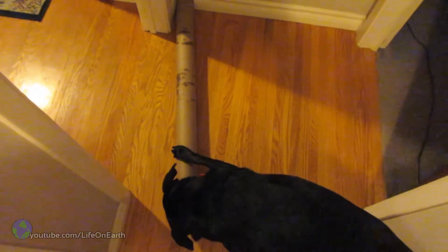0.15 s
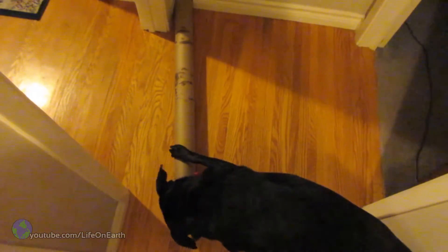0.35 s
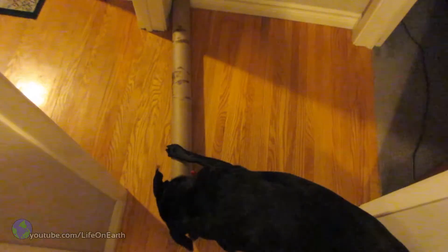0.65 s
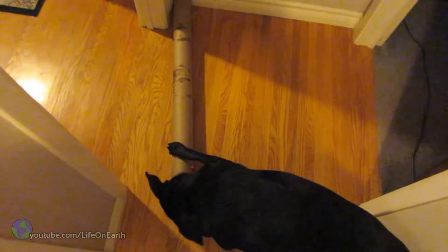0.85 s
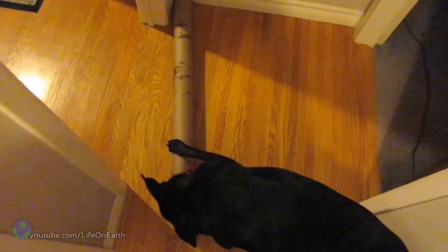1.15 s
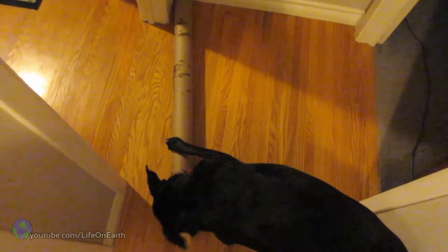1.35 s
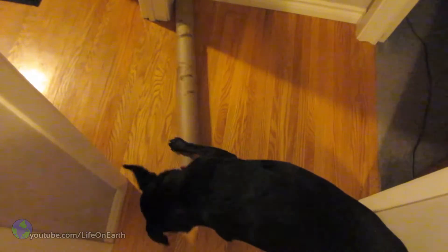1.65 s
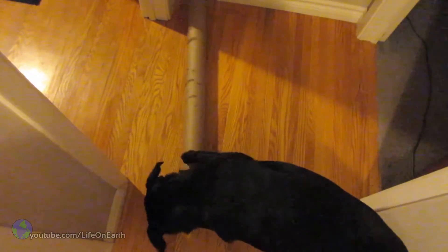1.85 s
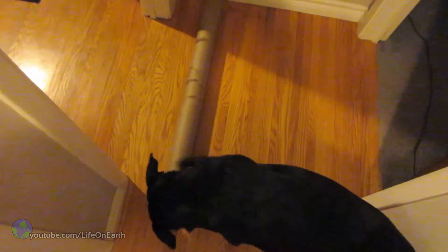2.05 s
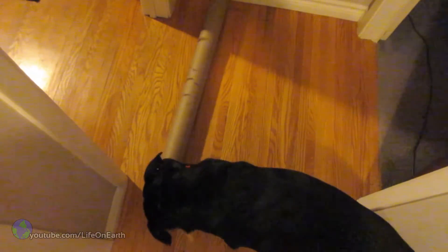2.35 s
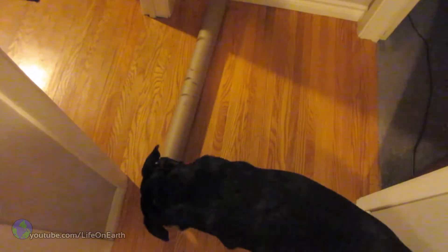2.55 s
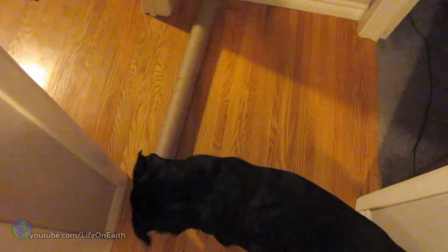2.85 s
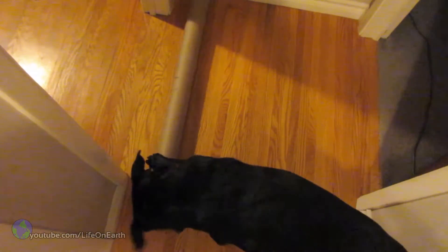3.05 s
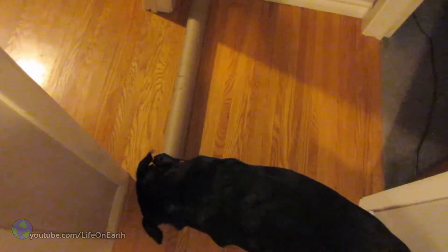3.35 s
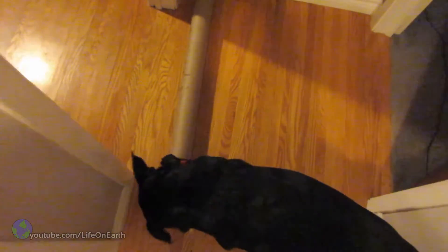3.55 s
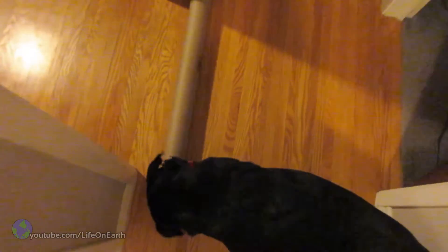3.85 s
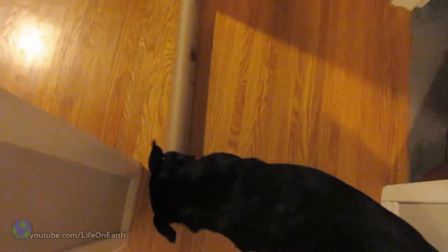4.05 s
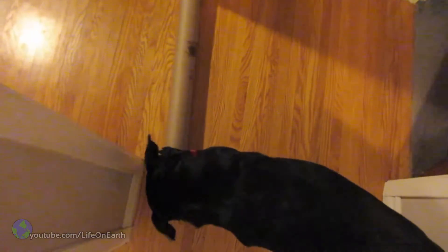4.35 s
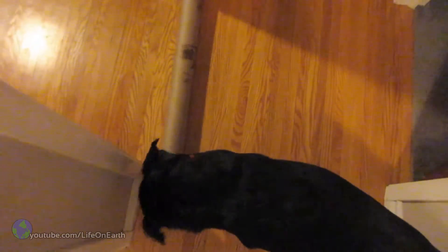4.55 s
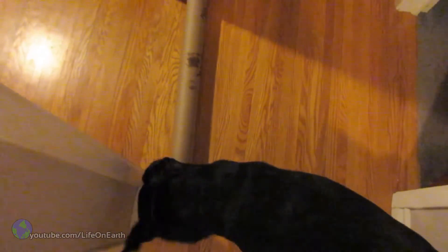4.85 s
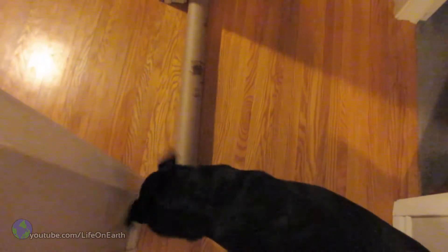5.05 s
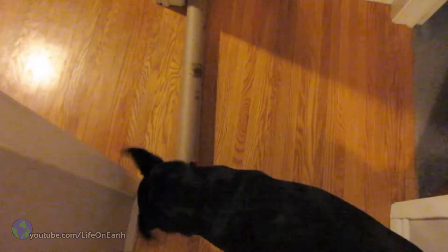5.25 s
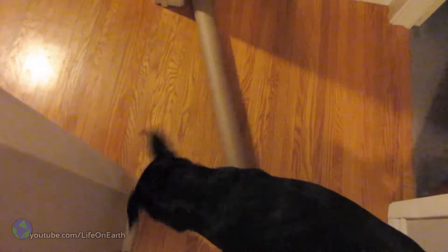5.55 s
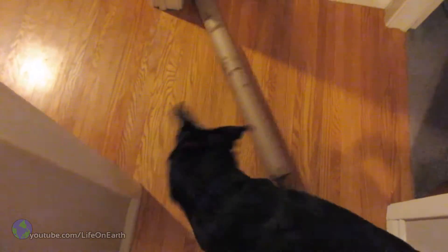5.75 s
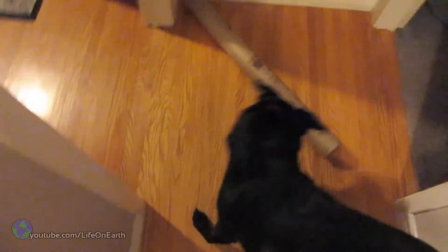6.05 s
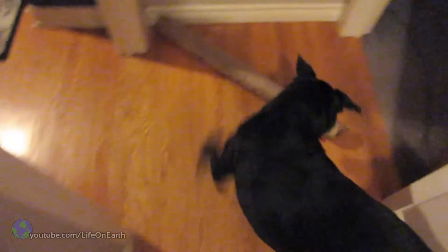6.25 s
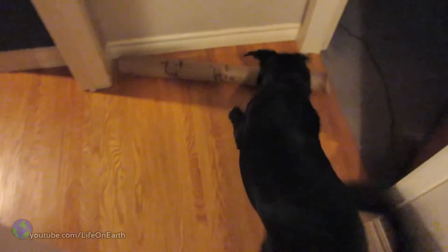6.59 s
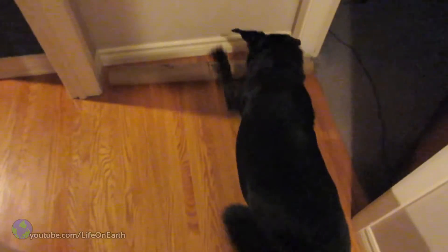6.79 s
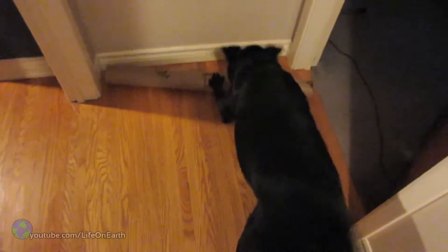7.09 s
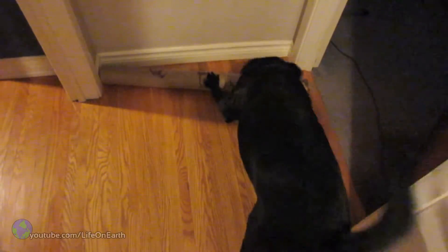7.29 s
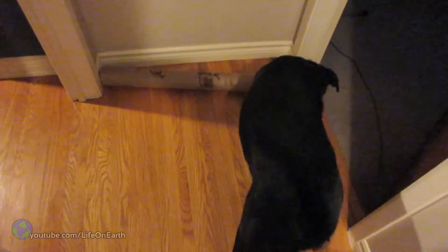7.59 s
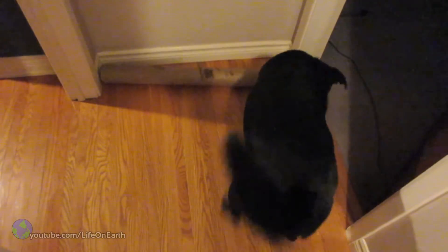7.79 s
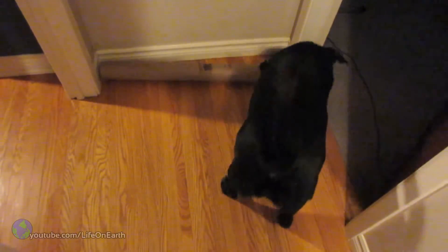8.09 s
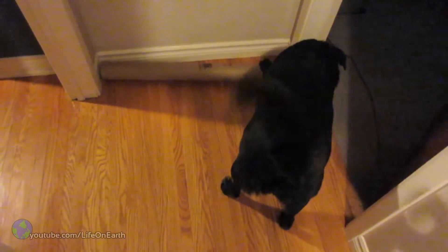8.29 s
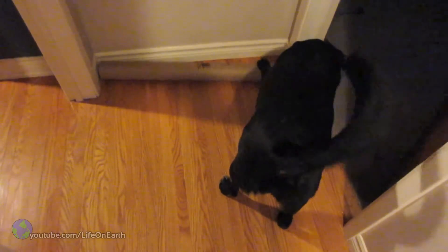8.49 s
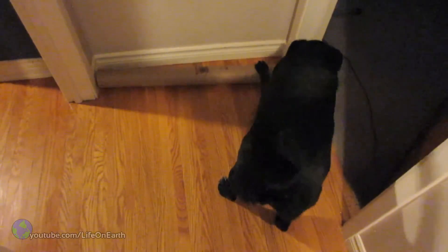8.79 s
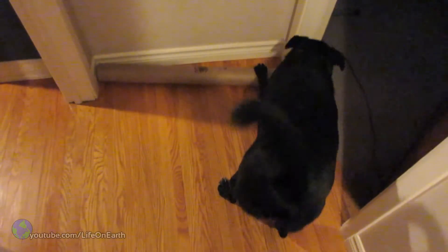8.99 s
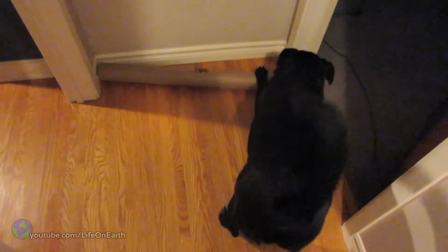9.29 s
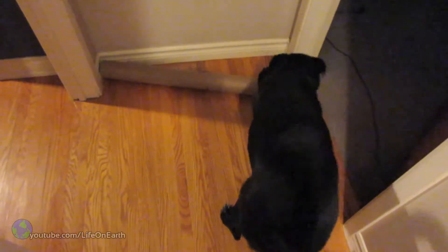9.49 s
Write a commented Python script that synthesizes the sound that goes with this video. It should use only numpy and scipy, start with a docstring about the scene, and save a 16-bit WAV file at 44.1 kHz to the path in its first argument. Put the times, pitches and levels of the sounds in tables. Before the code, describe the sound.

In a small indoor hallway, heard close from above, a dog wrestles a long cardboard tube. Light taps and dry rubbing come first, then a cluster of hollow knocks with boomy thuds around two seconds. Scrapes build to a hard knock, tags jingle faintly, and sharp clacks and paw thumps follow, thinning to scattered knocks and a last pair of solid bumps over quiet house hum.

```python
"""Small hallway with a hardwood floor: a dog shoves a long cardboard tube, heard from close above.
Knocks on door frames and boards are fibre-crunch noise through the modes of the cardboard wall;
heavy blows ring decaying sines of the boards and of the air in the tube.
Scraping is filtered grainy noise that follows the rubbing; collar tags are chatter through metal modes.
Fainter: whining tones, rolling weight, chance ticks, room reflections and the quiet of the house."""
import sys
import numpy as np
from scipy import signal
from scipy.fft import rfft, irfft
from scipy.io import wavfile
from scipy.ndimage import uniform_filter1d

SR = 44100
rng = np.random.default_rng(int(sys.argv[2]) if len(sys.argv) > 2 else 0)


def log_audio(samples):
    """Write samples as a 16-bit WAV file to the path given in sys.argv[1]."""
    # one column per channel
    frames = np.atleast_2d(samples).T
    # limit to full scale, then quantise
    limited = np.clip(frames, -1, 1)
    pcm = np.round(limited * 32767).astype(np.int16)
    wavfile.write(sys.argv[1], SR, pcm)


N = 424683
TIME = np.arange(N) / SR

# tube strikes wood: t/s, hollow level/dB, crack level/dB, crack band centre f/Hz,
# edge level before trim/dB, contact t60/s, air boom level/dB, air overtone level/dB
KNOCKS = [(0.012, -28, -29.5, 1650, -74, 0.12, -42, -45), (0.1153, -40, -43, 2080, -70, .06, -52, -50.5),
          (0.3823, -31, -26.5, 2620, -37.5, 0.092, -41.5, -46),
          (0.5794, -37, -17.5, 2400, -47, 0.023, -40, -45),
          (0.5849, -37.5, -39, 2730, -16.5, 0.013, -67, -66),
          (0.738, -78, -44.5, 3600, -43, 0.12, -73, -87.5), (1.0077, -54, -59, 2270, -59, 0.36, -58, -64),
          (1.3866, -34, -37.5, 2230, -33.5, .095, -68, -58),
          (1.875, -43, -40.5, 2030, -63, 0.1, -32.5, -38.5), (1.987, -26, -16, 2540, -64, 0.051, -55, -58),
          (2.046, -37.5, -35.5, 2510, -59, 0.086, -34, -36), (2.0808, -54, -25, 1490, -65, 0.073, -21, -37),
          (2.1484, -29, -18.5, 3600, -36, 0.048, -47, -48), (2.163, -24, -17, 2000, -47, 0.057, -31, -27.5),
          (2.2336, -34, -27, 1920, -42, .14, -23.5, -24), (2.2808, -49, -31, 1520, -63, 0.052, -55, -32),
          (2.771, -19, -17.5, 2000, -33, 0.086, -22.5, -30),
          (3.7543, -40, -24.5, 3300, -41, 0.055, -52, -52),
          (3.7782, -32.5, -26, 2410, -45, 0.1, -35.5, -50),
          (3.8505, -31.5, -32.5, 2290, -38, 0.22, -39, -41), (3.884, -43, -39, 2440, -63, 0.1, -55, -50.5),
          (4.069, -40.5, -63, 2100, -49, 0.049, -37.5, -44), (4.338, -33, -35, 2200, -37, 0.068, -47, -46),
          (4.382, -35.5, -33, 2360, -29, 0.2, -46, -52),
          (4.5416, -15, -18.5, 1870, -24, 0.028, -18.5, -24.5),
          (5.4948, -18, -19.5, 1550, -27.5, 0.086, -36, -40.5),
          (5.5432, -41, -26.5, 3000, -31.5, 0.16, -30, -36.5),
          (6.0577, -36, -23.5, 2930, -17.5, 0.054, -41, -50), (6.063, -45, -30, 2920, -24, 0.2, -48, -58),
          (6.2102, -46, -38, 2850, -40, 0.13, -47, -46),
          (6.4172, -24.5, -17.5, 3180, -14.5, .086, -23, -37),
          (6.4597, -23.5, -21, 2500, -20.5, 0.13, -23.5, -31.5),
          (6.512, -39, -28, 3180, -22, 0.12, -49, -38), (6.697, -68, -42, 3650, -37, 0.099, -40, -59),
          (6.7877, -14.5, -19.5, 2610, -36, 0.021, -30, -26),
          (6.8894, -33, -47, 1510, -63, 0.049, -56, -61), (6.9091, -34, -36.5, 2650, -37.5, .11, -26, -38),
          (7.1424, -37.5, -34.5, 1750, -59, 0.061, -60, -58),
          (7.2162, -42.5, -56, 2200, -56, 0.23, -55, -46), (7.2751, -36, -45, 1680, -90, 0.16, -33, -38),
          (7.5755, -28.5, -37.5, 1650, -72, .087, -29.5, -37.5),
          (7.6392, -33, -19, 3350, -20, .053, -36, -48), (7.647, -34, -24.5, 2700, -51, 0.14, -22, -19),
          (7.8345, -75, -49.5, 3250, -44.5, 0.14, -50, -62),
          (7.868, -59, -44.5, 3170, -45, 0.069, -52, -53), (7.9928, -67, -32.5, 3100, -18, 0.11, -33, -43),
          (8.137, -43.5, -43, 2560, -61, 0.3, -59, -56), (8.3868, -43, -57, 2120, -57, .086, -46, -50.5),
          (8.8454, -44, -42, 2640, -45, 0.61, -48, -46),
          (8.9621, -17.5, -22.5, 1780, -39, 0.12, -27.5, -37),
          (9.003, -18, -25.5, 1640, -47, 0.095, -24, -29), (9.1977, -40, -45, 1950, -51, 0.18, -45, -51),
          (9.2845, -40, -41, 2320, -43, 0.28, -54, -51), (9.376, -31, -28, 2550, -33, 0.12, -27.5, -31.5),
          (9.5078, -43, -33, 3330, -32.5, 0.17, -55, -63), (9.587, -45, -34.5, 3000, -47, 0.11, -55, -50)]
# low modes of the floor: f/Hz, relative level/dB, t60/s
FLOOR_MODES = [(53, -33, 0.4), (66.5, -4, 1), (81, 11, 0.42)]
# lowest modes of the air in the tube: f/Hz, relative level/dB, t60/s
BOOM_MODES = [(128.6, -11.5, 0.46), (151.3, -1.5, 0.26), (157.5, -11.5, 0.56), (174.1, -12, 0.32)]


def knocks(rise_s=0.002, edge_trim_db=-4.0, crack_width=1.554, hollow_width=1.385,
           snap_t60_s=0.006, edge_snap_t60_s=0.011):
    """Each contact is a short crunch of fibres that rings the wall; a longer contact has a deeper hollow."""
    # sharp edge spectrum: f/Hz, relative level/dB
    edge_spectrum = [(3000, -1.5), (5000, 8.5), (7000, 8), (9500, 3), (12000, -6), (15000, -24.5)]
    brief_contact_t60_s, brief_hollow_hz, sag_octaves_per_doubling = 0.049, 810, 0.12
    out, t, attack = np.zeros(N), np.arange(SR // 4) / SR, SR // 40
    for s, hollow_db, crack_db, crack_hz, edge_db, t60_s, _, _ in KNOCKS:
        stretch = max(t60_s / brief_contact_t60_s, 1)
        hollow_hz = brief_hollow_hz / stretch ** sag_octaves_per_doubling
        pressure = (fade(t, t60_s) + fade(t, snap_t60_s)) * np.minimum(t / rise_s, 1)
        force = even(grains(len(t), per_s=1900, spread_db=3.5) * pressure)
        hollow = wall(band(force, hollow_hz / hollow_width, hollow_hz * hollow_width))
        crack = wall(band(force, crack_hz / crack_width, crack_hz * crack_width))
        edge = colour(force * (1 + fade(t, edge_snap_t60_s)), edge_spectrum)
        sound = from_db(hollow_db) * rms_one(hollow, attack)
        sound += from_db(crack_db) * rms_one(crack, attack)
        sound += from_db(edge_db + edge_trim_db) * rms_one(edge, attack)
        add(out, s - .0012, sound)
    return out


def wall(x):
    """The cardboard wall passes a force on and rings at its modes."""
    # f/Hz, width/Hz, level/dB
    wall_modes = [(566, 18, -8.5), (667, 9.9, -3), (760, 28, -10.5), (836, 33, -7.5), (993, 50, 0),
                  (1277, 57, -16), (1436, 270, 9), (1980, 82, -10), (2440, 35, -29), (2690, 85, -9),
                  (3320, 160, -13), (4100, 130, -17), (4800, 400, -9.5)]
    return x + sum(from_db(db) * resonance(x, hz, width_hz) for hz, width_hz, db in wall_modes)


def heavy_blows():
    """Knocks and paws reach the low modes: rows t/s, strongest overtone f/Hz, floor, boom, overtones/dB."""
    # soft, heavy paw blows: t/s, floor level/dB, tube boom level/dB
    paws = [(1.894, -34, -34.5), (2.043, -34, -42), (2.097, -30, -24), (4.222, -57, -38), (4.69, -41, -30),
            (4.745, -52, -36.5), (5.453, -39, -38), (5.551, -38, -32), (5.739, -41.5, -44.5),
            (5.86, -37, -42), (6.059, -39, -43), (6.129, -31, -33.5), (6.2, -31, -28.5),
            (6.321, -31.5, -40), (6.432, -42, -23), (6.469, -32, -34), (6.68, -48, -42), (6.831, -42, -26),
            (6.912, -39, -33), (7.18, -46, -33), (7.673, -44, -23), (7.998, -36, -50), (8.196, -58, -39.5),
            (9.311, -39, -25.5), (9.447, -45, -37)]
    paw_overtone_hz, paw_overtones_below_boom_db = 272, 6
    knock_overtone_hz, overtone_octaves_per_db = 312.4, 0.04
    boom_lag_s, floor_below_boom_db = 0.00305, 18.5  # the air answers just after a knock, shaking the boards
    blows = [(s, paw_overtone_hz, floor_db, boom_db, boom_db - paw_overtones_below_boom_db)
             for s, floor_db, boom_db in paws]
    for s, hollow_db, *_, boom_db, overtones_db in KNOCKS:
        # more wall than air favours higher overtones
        brightness_db = np.clip(hollow_db - overtones_db, -1.5, 7)
        hz = knock_overtone_hz * 2 ** (overtone_octaves_per_db * brightness_db)
        blows.append((s + boom_lag_s, hz, boom_db - floor_below_boom_db, boom_db, overtones_db))
    return blows


def thumps(rise_s=0.0037, db_per_octave=32, rumble_db=-9, rumble_t60_s=.22):
    """Heavy blows ring the boards and the air column, with a short rumble around the modes."""
    # upper modes of the air in the tube: f/Hz, relative level/dB, t60/s
    overtone_modes = [(248.1, -1.5, 0.49), (279.7, -3.5, 0.56), (302.6, -0.5, 0.36), (352.5, -4, 0.46),
                      (420.3, 4, 0.4), (470.5, 6.5, 0.2)]
    out, t, attack = np.zeros(N), np.arange(SR * 3 // 5) / SR, SR // 16
    for s, strongest_hz, *levels_db in heavy_blows():
        overtones = [(hz, db - db_per_octave * abs(np.log2(hz / strongest_hz)), t60_s)
                     for hz, db, t60_s in overtone_modes]
        for db, modes in zip(levels_db, (FLOOR_MODES, BOOM_MODES, overtones)):
            burst = rng.standard_normal(len(t)) * fade(t, rumble_t60_s)
            rumble = band(burst, modes[0][0] * 1.12, modes[-1][0] * 1.29)
            tone = ring(modes, t) * np.minimum(t / rise_s, 1)
            blow = rms_one(tone, attack) + from_db(rumble_db) * rms_one(rumble, attack)
            add(out, s - .003, from_db(db) * rms_one(blow, attack))
    return out


def scraping(rasp_trim_db=-1, scuff_hiss_trim_db=-1, fizz_db=-6):
    """Cardboard drags over wood grain: steady rubbing with shoves on top; a few wall modes sing along."""
    # steady rubbing: t/s, rasp level before trim/dB
    rubbing = [(0, -55.5), (0.45, -55.5), (0.85, -68.5), (1.25, -54.5), (1.5, -52), (1.72, -42.5),
               (1.97, -58.5), (2.45, -47.5), (3.0, -64.5), (3.7, -52), (4.65, -51.5), (4.9, -53.5),
               (6.2, -48.5), (6.8, -58.5), (7.95, -65), (8.2, -50), (9.0, -58), (9.63, -39.5)]
    # shoves that swell and fade: peak t/s, rasp level before trim/dB, half length/s,
    # hiss above rasp before trims/dB
    scuffs = [(1.352, -41.5, 0.012, 2.5), (1.666, -33.5, 0.026, -7.5), (1.823, -31.5, 0.016, 2),
              (2.41, -44, 0.029, 0), (2.629, -36, .014, -1.5), (2.721, -47, 0.011, 1),
              (2.816, -52, 0.031, 7.5), (3.296, -51, .012, -14), (3.444, -50, .016, -20),
              (3.58, -43.5, 0.024, -3), (3.67, -34, 0.019, -6), (4.047, -40, 0.021, 0.5),
              (4.199, -33.8, .068, 4), (4.457, -32, 0.059, 1.5), (4.527, -25.5, .02, -4.5),
              (4.588, -33, 0.062, -7.5), (4.317, -40.5, 0.035, -11), (5.479, -33.5, 0.096, -4),
              (5.845, -50.5, 0.013, 9.5), (7.188, -49.5, 0.05, -4), (7.536, -43, 0.021, -3),
              (8.662, -48.5, 0.038, -39), (8.902, -47.5, 0.033, 0.5), (9.34, -42, 0.042, -3),
              (9.383, -32, 0.013, 3.5), (9.614, -40.5, 0.019, 12.5)]
    # wall modes under rubbing: f/Hz, width of each of two stages/Hz, level at the reference rasp/dB
    singing_modes = [(1183, 360, -55), (1510, 175, -51.5), (2370, 320, -56.5)]
    # spectra: f/Hz, relative level/dB
    hollow_spectrum = [(180, -9.5), (380, 8), (650, 10), (1000, 8), (1300, 2), (2200, -23.5)]
    rasp_spectrum = [(700, -24), (1150, 4.5), (1520, -4.5), (1750, 4), (2700, 7.5), (4500, 2), (7000, -15)]
    hiss_spectrum = [(3000, -4.5), (5000, 1.5), (7500, 2.5), (10000, -1.5), (12500, -10), (15000, -74)]
    # steady hollow and hiss levels at the reference rasp; hollow gains fewer dB per dB of rasp
    reference_rasp_db, hollow_db, hollow_db_per_rasp_db, hiss_db = -42.5, -47, 0.63, -47.5

    rasp = from_db(np.interp(TIME, *np.transpose(rubbing)))
    reference = from_db(reference_rasp_db)
    hiss = from_db(hiss_db) * rasp / reference
    for peak_s, db, half_s, bright_db in scuffs:
        scuff = from_db(db) * swell(peak_s, half_s)
        rasp = np.hypot(rasp, scuff)
        hiss = np.hypot(hiss, scuff * from_db(bright_db + scuff_hiss_trim_db))
    effort = rasp / reference
    hollow = np.hypot(from_db(hollow_db) * effort ** hollow_db_per_rasp_db, rattle())

    friction = grains(N, per_s=220, spread_db=3.0)
    out = hollow * rms_one(wall(colour(friction, hollow_spectrum)))
    out += from_db(rasp_trim_db) * rasp * rms_one(wall(colour(friction, rasp_spectrum)))
    out += hiss * rms_one(colour(grains(N, per_s=750, spread_db=2.0), hiss_spectrum))
    for hz, width_hz, db in singing_modes:
        tone = resonance(resonance(rng.standard_normal(N), hz, width_hz), hz, width_hz)
        out += effort * from_db(db) * rms_one(tone)
    # the strongest hiss adds a fizz at the very top
    fizz = hiss ** 2 / hiss.max() * rms_one(band(friction, 8400, 14600))
    return out + from_db(fizz_db) * fizz


def rattle(below_overtones_db=2.5, rise_s=0.021, t60_s=0.22):
    """Level of the tube settling on the boards after each heavy blow; powers add."""
    power, t = np.zeros(N), np.arange(SR) / SR
    settle = np.minimum(t / rise_s, 1) * fade(t, t60_s)
    for s, *_, overtones_db in heavy_blows():
        add(power, s, (from_db(overtones_db - below_overtones_db) * settle) ** 2)
    return np.sqrt(power)


def tags(trim_db=-13, chatter_t60_s=.038, tick_db=-5):
    """Small metal tags chatter briefly against each other as the dog moves its head."""
    # contacts: t/s, level before trim/dB
    tag_hits = [(2.872, -37), (2.913, -34), (4.786, -29.5), (4.888, -40), (5.045, -27), (5.618, -31.5),
                (5.673, -34.5), (5.734, -26), (5.756, -21.5), (5.791, -30), (5.899, -35.5), (6.015, -40),
                (6.189, -36), (6.678, -29), (8.268, -36), (8.318, -40)]
    # f/Hz, relative level/dB, t60/s
    tag_modes = [(5690, -7.5, 0.21), (5440, -1, 0.058), (7300, -14, 0.18), (8300, -10, 0.047),
                 (8420, 0, 0.16), (9400, -19, .15), (10700, -12, 0.13), (10730, 0, 0.097),
                 (13400, -9, 0.13), (13660, -5, .12), (14100, -21, 0.12), (14300, -15, 0.12)]
    out, t, attack = np.zeros(N), np.arange(SR // 3) / SR, SR // 40
    for s, db in tag_hits:
        chatter = grains(len(t), per_s=1900, spread_db=4.0) * fade(t, chatter_t60_s)
        tone = rms_one(signal.fftconvolve(chatter, ring(tag_modes, t))[:len(t)], attack)
        tick = rms_one(band(chatter, 4600, 13000), attack)
        add(out, s, from_db(db + trim_db) * (tone + from_db(tick_db) * tick))
    return out


def whines():
    """Narrow, unsteady tones: rubbing keeps a single mode singing."""
    # peak t/s, half length/s, f/Hz, half the width of each of two stages/Hz, level/dB
    whine_rows = [(0.196, 0.0045, 3580, 150, -47.5), (0.468, 0.13, 573, 59, -46),
                  (1.254, 0.13, 3380, 200, -55.5), (2.585, 0.21, 3120, 250, -53),
                  (4.043, 0.023, 1510, 60, -43), (5.12, 0.089, 1490, 50, -50),
                  (7.245, 0.013, 2280, 120, -48)]
    rub, out = rng.standard_normal(N), np.zeros(N)
    for peak_s, half_s, hz, half_width_hz, db in whine_rows:
        tone = resonance(resonance(rub, hz, 2 * half_width_hz), hz, 2 * half_width_hz)
        out += from_db(db) * swell(peak_s, half_s) * rms_one(tone)
    return out


def rolling():
    """Soft pads and slowly shifting weight drive the low modes without a blow."""
    # peak t/s, half length/s, floor level/dB, tube boom level/dB
    rolls = [(0.872, 0.023, -48, -60), (1.637, 0.054, -53.5, -46), (1.854, 0.051, -42, -43),
             (4.463, 0.036, -60, -37), (5.646, 0.2, -48, -46), (6.42, 0.027, -40, -33),
             (8.303, .05, -71, -43.5), (8.613, 0.051, -51, -45)]
    out, push = np.zeros(N), band(rng.standard_normal(N), 43, 300)
    for k, modes in enumerate((FLOOR_MODES, BOOM_MODES)):
        # mode width from its decay time
        drone = rms_one(sum(from_db(db) * resonance(push, hz, np.log(1000) / (np.pi * t60_s))
                            for hz, db, t60_s in modes))
        out += drone * sum(from_db(levels_db[k]) * swell(s, half_s) for s, half_s, *levels_db in rolls)
    return out


def ticks(per_s=8, level_db=-58, spread_db=2, contact_t60_s=0.085, low_hz=500, high_hz=3200):
    """Faint chance touches of claws and teeth: decaying noise bursts through the cardboard wall."""
    force, t = np.zeros(N), np.arange(SR // 8) / SR
    for s in TIME[rng.random(N) < per_s / SR]:
        gain = from_db(level_db + spread_db * rng.standard_normal())
        add(force, s, gain * rng.standard_normal(len(t)) * fade(t, contact_t60_s))
    # make up for the power lost outside the band
    return wall(band(force, low_hz, high_hz)) * np.sqrt(SR / 2 / (high_hz - low_hz))


def hallway(x, first_echo_s=0.0014, build_s=0.0068):
    """Dense reflections from close walls: decaying noise bands, the low mids lasting longest."""
    # f/Hz, t60/s
    hall_t60 = [(100, 0.11), (300, 0.54), (800, 0.32), (2000, 0.28), (5000, 0.25), (13000, 0.19)]
    t, edges_hz = np.arange(SR * 2 // 3) / SR, np.geomspace(60, 18000, 9)
    echoes = np.zeros(len(t))
    for low_hz, high_hz in zip(edges_hz, edges_hz[1:]):
        t60_s = at_hz(hall_t60, np.sqrt(low_hz * high_hz))
        echoes += band(rng.standard_normal(len(t)), low_hz, high_hz) * fade(t, t60_s)
    echoes *= np.clip((t - first_echo_s) / build_s, 0, 1)
    return signal.fftconvolve(x, echoes / np.linalg.norm(echoes))[:N]


def house_quiet(level_db=-54.5):
    """Steady coloured noise: the quiet of the house."""
    # f/Hz, relative level/dB
    quiet_spectrum = [(15, -62), (25, 16), (81, -1), (142, 13), (383, 1), (978, -14), (1280, -10),
                      (1500, -8), (1670, -13.5), (3350, -12.5), (8320, -17.5), (13800, -54), (15000, -83)]
    return from_db(level_db) * rms_one(colour(rng.standard_normal(N), quiet_spectrum))


def from_db(db):
    """Decibels to gain."""
    return 10 ** (np.asarray(db) / 20)


def rms_one(x, size=None):
    """Scale so that the first size samples have rms 1."""
    return x / np.sqrt(np.mean(x[:size] ** 2) + 1e-20)


def fade(t, t60_s):
    """Exponential decay, -60 dB at t60_s."""
    return np.exp(-np.log(1000) * t / t60_s)


def swell(peak_s, half_s):
    """Bell-shaped rise and fall."""
    return np.exp(-.5 * np.minimum(((TIME - peak_s) / half_s) ** 2, 100))


def at_hz(points, hz):
    """Read a table on a log-frequency axis."""
    f, value = np.transpose(points)
    return np.interp(np.log(np.maximum(hz, 1)), np.log(f), value)


def add(track, s, sound):
    """Mix a sound in at time s."""
    i = max(round(s * SR), 0)
    track[i:i + len(sound)] += sound[:N - i]


def band(x, low_hz, high_hz):
    """Butterworth band-pass."""
    edges_hz = [low_hz, min(high_hz, SR / 2 - 100)]
    return signal.sosfilt(signal.butter(2, edges_hz, "band", fs=SR, output="sos"), x)


def colour(x, spectrum):
    """Causal (minimum-phase) filter with the given spectrum, by folding the cepstrum."""
    size = 4096
    gain = from_db(at_hz(spectrum, np.fft.rfftfreq(size, 1 / SR)))
    cepstrum = irfft(np.log(gain))
    cepstrum[1:size // 2] *= 2
    cepstrum[size // 2 + 1:] = 0
    return signal.fftconvolve(x, irfft(np.exp(rfft(cepstrum))))[:len(x)]


def resonance(x, hz, width_hz):
    """Two-pole resonator with gain 1 at its top."""
    r = np.exp(-np.pi * width_hz / SR)
    zeros = np.array([1, 0, -1]) * (1 - r * r) / 2
    poles = [1, -2 * r * np.cos(2 * np.pi * hz / SR), r * r]
    return signal.lfilter(zeros, poles, x)


def ring(modes, t):
    """One blow on a set of modes, each with a random sign and strength."""
    hz, db, t60_s = np.transpose(modes)[:, :, None]
    strength = from_db(db + rng.standard_normal(hz.shape)) * rng.choice([-1, 1], hz.shape)
    return np.sum(strength * np.sin(2 * np.pi * hz * t) * fade(t, t60_s), axis=0)


def grains(size, per_s, spread_db):
    """Fibres catching and letting go: noise whose strength glides to a new random value per_s times a second."""
    steps = np.clip(rng.standard_normal(size), -2, 2)
    strength = np.interp(np.arange(size) * min(per_s / SR, 1), np.arange(size), steps)
    return rms_one(rng.standard_normal(size) * from_db(spread_db * strength))


def even(force):
    """Level broad hills in a burst's spectrum, so that its colour comes from the struck body."""
    spectrum = rfft(force, 2 * len(force))
    smooth_power = uniform_filter1d(np.abs(spectrum) ** 2, size=400)
    return irfft(spectrum / np.sqrt(smooth_power + 1e-12))[:len(force)]


def scene():
    """All sources and their reflections over the quiet of the house; same signal in both channels."""
    hits = knocks()
    lows = thumps() + rolling()
    drag = scraping() + whines() + tags() + ticks()
    room = hallway(from_db(-10.0) * hits + from_db(-9.5) * drag)
    return np.tile(hits + drag + lows + room + house_quiet(), (2, 1))


def record(dry, low_cut_hz=36, full_scale=.9, top_cut_hz=15200):
    """The microphone drops the deepest bass, the loudest peaks overload and the top is cut."""
    heard = signal.sosfilt(signal.butter(2, low_cut_hz, "high", fs=SR, output="sos"), dry)
    heard = heard / (1 + (heard / full_scale) ** 6) ** (1 / 6)  # soft limit
    return signal.sosfilt(signal.ellip(10, .1, 70, top_cut_hz, fs=SR, output="sos"), heard)


dry = scene()
out = record(dry)
log_audio(out)
```